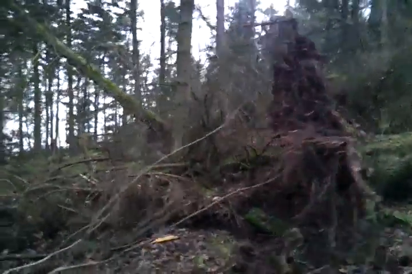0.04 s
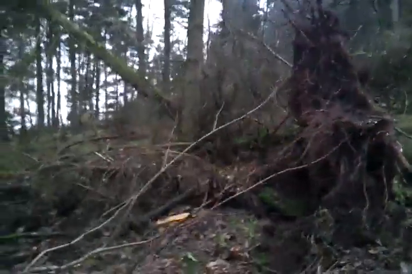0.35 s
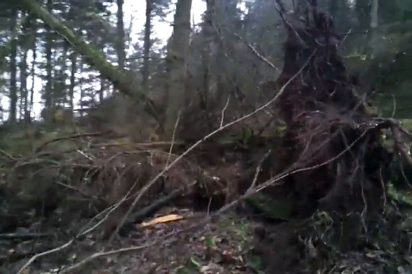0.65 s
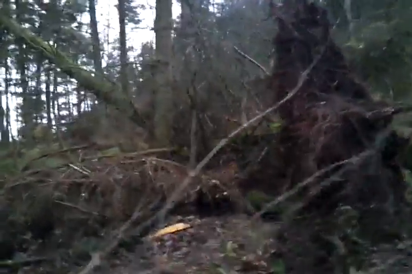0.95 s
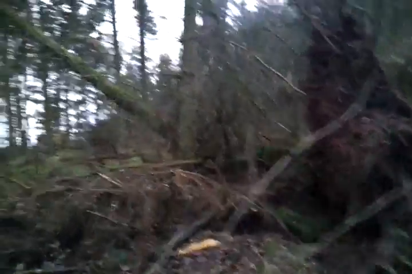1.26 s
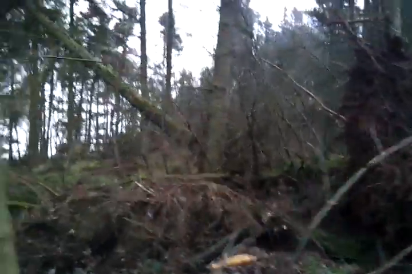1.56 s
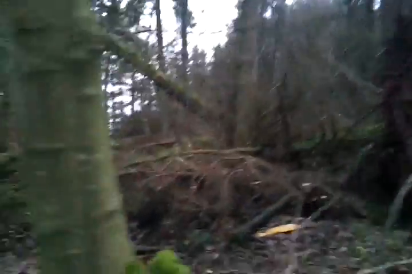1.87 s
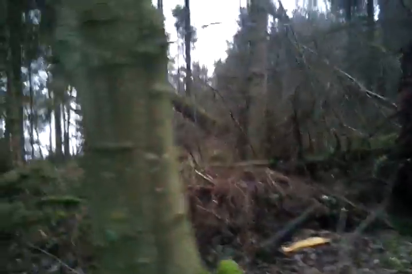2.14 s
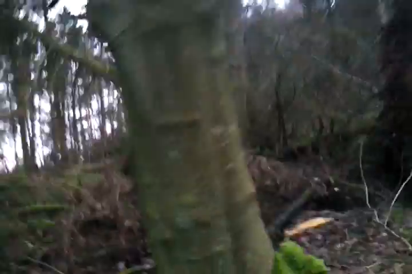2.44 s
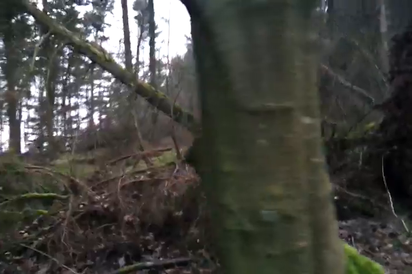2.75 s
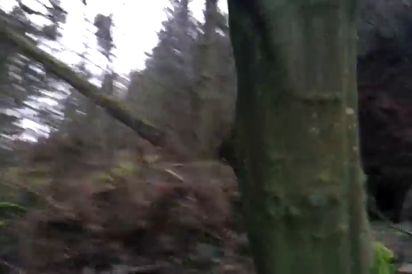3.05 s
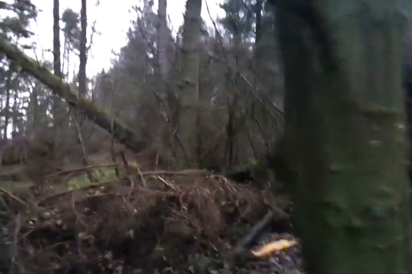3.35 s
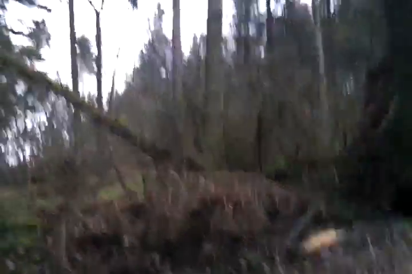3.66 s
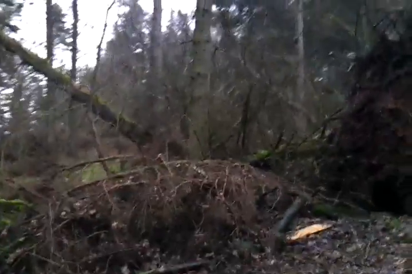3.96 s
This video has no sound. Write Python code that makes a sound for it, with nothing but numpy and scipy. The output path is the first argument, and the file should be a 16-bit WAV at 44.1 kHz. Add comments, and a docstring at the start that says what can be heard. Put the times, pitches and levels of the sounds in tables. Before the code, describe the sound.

Wind buffets the microphone and hisses through conifers while slow, soft steps crack small twigs.

```python
"""Wind hisses steadily through conifer crowns from the start, and gusts buffet the microphone:
the harder they blow, the louder and brighter the rumble. Someone walks slowly over the forest floor,
each step crushing needle litter. From 0.85 s on a dry twig snaps now and then; the strongest gusts
come just after 1 s, the sharpest snap at 1.7 s. The recorder is dull above 7 kHz throughout."""
import sys
import numpy as np
from scipy import signal
from scipy.fft import rfft, irfft
from scipy.io import wavfile

SR = 44100
rng = np.random.default_rng(int(sys.argv[2]) if len(sys.argv) > 2 else 0)


def inscribe(sig):
    """Save sig as 16-bit PCM at rate SR to the path in sys.argv[1].

    A 1-D sig is mono; a 2-D sig holds one channel per row.
    Samples are clipped to [-1, 1] before scaling.
    """
    pcm = np.round(np.clip(np.atleast_2d(sig).T, -1, 1) * 32767)
    wavfile.write(sys.argv[1], SR, pcm.astype(np.int16))


N = 176400


def undb(db):
    """Decibels to gain."""
    return 10 ** (np.asarray(db) / 20)


def unit(x):
    """Scale to rms 1."""
    return x / np.sqrt(np.mean(x ** 2))


def curve(rows):
    """Join (time_s, value) rows by straight lines."""
    return np.interp(np.arange(N) / SR, *np.array(rows).T)


def at_hz(rows, hz):
    """Read (freq_hz, value) rows on a log-frequency axis."""
    freq_hz, values = np.array(rows).T
    return np.interp(np.log(np.maximum(hz, 1)), np.log(freq_hz), values)


def colour(x, rows):
    """Filter by (freq_hz, gain_db) rows."""
    freq_hz = np.arange(N + 1) * SR / (2 * N)
    return irfft(rfft(x, 2 * N) * undb(at_hz(rows, freq_hz)))[:N]


def bands(x, count=20):
    """Yield (centre_hz, band) for overlapping half-octave bands from 20 Hz up."""
    spectrum = rfft(x)
    freq_hz = np.arange(N // 2 + 1) * SR / N
    half_octaves = 2 * np.log2(np.maximum(freq_hz, 20) / 20)
    for k in range(count):
        weight = np.maximum(1 - abs(half_octaves - k), 0)
        yield 20 * 2 ** (k / 2), irfft(spectrum * weight, N)


def wander(rate_hz):
    """Smooth random drift, rms 1, changing about rate_hz times a second."""
    freq_hz = np.arange(N // 2 + 1) * SR / N
    lowpass = np.exp(-(2 * freq_hz / rate_hz) ** 2 / 2)
    return unit(irfft(rfft(rng.standard_normal(N)) * lowpass, N))


def canopy():
    """Air through countless needles: a smooth hiss whose bands sway and flutter a little."""
    # hiss spectrum: freq_hz, density_db
    spectrum = [(100, -4), (300, -0.5), (500, 3), (800, -.5), (1300, 0), (2200, -2), (3500, -5.5),
                (5000, -7), (6600, -9), (9000, -9.5)]
    # hiss level: time_s, level_db
    levels = [(0, -33.5), (.6, -35.3), (1.4, -33.5), (2.1, -33.5), (2.7, -34), (3.3, -33.5), (4, -33)]
    sway_db, flutter_db = 1.25, .5
    hiss = unit(colour(rng.standard_normal(N), spectrum))
    swaying = sum(band * undb(sway_db * wander(rate_hz=5.6) + flutter_db * wander(rate_hz=39))
                  for _, band in bands(hiss))
    return undb(curve(levels)) * swaying


def fractures(rate_per_s=1500, spread_db=3):
    """Tiny fractures at random moments, a few much larger than the rest."""
    size = undb(spread_db * np.minimum(rng.exponential(size=N), 4))
    breaks = rng.random(N) < rate_per_s / SR
    return breaks * rng.choice([-1, 1], N) * size


def footsteps():
    """Needles and bark crackle as each step loads the litter, over a faint steady rustle."""
    # steps and scuffs: peak_s, half_length_s, level_db, bark_re_needles_db
    steps = [(.1, .1, -55, -7), (.75, 0.031, -36.5, -2), (.855, 0.025, -39, -17), (1.66, .09, -37, -8),
             (1.81, 0.017, -44, -14), (2.35, 0.079, -39.5, -2.5), (3.075, 0.093, -43, 1.5),
             (3.245, 0.026, -36, -14), (3.59, .04, -40.5, -7), (3.87, 0.027, -44.5, -1)]
    # crushed needles: freq_hz, density_db
    needle_spectrum = [(500, -9.5), (1500, -16.5), (3000, -7), (4300, -0.5), (5600, 4), (6800, 4),
                       (9000, -12)]
    # crushed bark and sticks: freq_hz, density_db
    bark_spectrum = [(300, -9), (900, -11), (2700, -2.5), (4000, -2), (7000, -11.5)]
    rustle_db = -45.5
    t = np.arange(N) / SR
    needle_gain, bark_gain = np.zeros(N), np.zeros(N)
    for peak_s, half_length_s, level_db, bark_re_needles_db in steps:
        load = undb(level_db) * np.exp(-((t - peak_s) / half_length_s) ** 2 / 2)
        needle_gain += load
        bark_gain += undb(bark_re_needles_db) * load
    needles = unit(colour(fractures(), needle_spectrum))
    bark = unit(colour(fractures(), bark_spectrum))
    return needles * np.hypot(needle_gain, undb(rustle_db)) + bark * bark_gain


def resonate(x, centre_hz, width_hz):
    """One resonance, gain 1 at its centre."""
    return signal.lfilter(*signal.iirpeak(centre_hz, centre_hz / width_hz, fs=SR), x)


def twigs():
    """Each snap: about 1 ms of tearing fibres rings the wood, with a faint tail of splinters."""
    # twig snaps: start_s, ring_peak_db, ring_hz, crack_re_ring_db, decay_s
    snaps = [(0.855, -19.5, 6300, -10, .001), (.8635, -15, 4960, -3.5, 0.0011),
             (1.0728, -16, 6400, 5, 0.00049), (1.1945, -16.5, 5900, -17, 0.00094),
             (1.615, -16.5, 6740, -1.5, 0.0015), (1.703, -7, 6800, -17, .0017),
             (1.722, -25, 6200, -12, 0.00104), (1.756, -10.5, 5400, -13, 0.0013),
             (2.3508, -15, 6000, -4, 0.00092), (3.114, -18, 5360, -3, 0.0015),
             (3.29, -19.5, 5850, -11, .001), (3.739, -16, 5960, -11, .0007),
             (3.8289, -16, 5960, -12, .0005), (3.833, -8.5, 4660, -19, .0004)]
    # wood resonances: freq_ratio, relative_width, gain_db
    modes = [(0.701, 0.21, -6), (1.03, 0.51, 4)]
    splinter_db, splinter_decay_s = -25, 0.013
    t = np.arange(SR // 20) / SR
    splinters = undb(splinter_db) * np.exp(-t / splinter_decay_s)
    out = np.zeros(N)
    for start_s, ring_peak_db, ring_hz, crack_re_ring_db, decay_s in snaps:
        tear = rng.choice([-1., 1.], len(t)) * (np.exp(-t / decay_s) + splinters)
        ring = sum(undb(gain_db) * resonate(tear, ring_hz * ratio, ring_hz * ratio * width)
                   for ratio, width, gain_db in modes)
        crack = resonate(tear, centre_hz=1250, width_hz=1300)
        snap = ring / abs(ring).max() + undb(crack_re_ring_db) * crack / abs(crack).max()
        start = int(start_s * SR)
        out[start:start + len(t)] += undb(ring_peak_db) * snap[:N - start]
    return out


def buffeting():
    """Turbulence on the microphone: gusts and slaps raise the small, fast, bursty eddies most."""
    # gusts at the microphone: time_s, strength_db
    gusts = [(0.0, -24.5), (0.07, -30), (0.11, -14), (0.13, -32), (0.17, -20.5), (0.22, -29), (0.34, -39),
             (0.4, -22), (0.42, -27), (0.5, -13.5), (0.68, -32.5), (0.71, -16.5), (0.86, -39.5),
             (0.99, -33.5), (1.04, -11), (1.18, -18.5), (1.19, -7), (1.29, -34), (1.32, -20.5),
             (1.55, -30.5), (1.67, -24), (1.7, -33), (1.82, -25), (1.84, -34), (1.98, -28), (2.0, -19),
             (2.07, -13.5), (2.09, -24), (2.16, -15), (2.36, -28), (2.38, -19), (2.53, -30), (2.56, -19.5),
             (2.66, -21.5), (2.67, -23), (2.73, -14.5), (2.78, -23), (2.82, -16.5), (2.96, -32.5),
             (2.99, -18), (3.06, -10.5), (3.1, -21), (3.25, -33.5), (3.31, -24), (3.35, -34.5), (3.38, -11),
             (3.43, -19.5), (3.49, -15), (3.52, -13.5), (3.55, -15), (3.62, -10.5), (3.69, -18.5),
             (3.71, -14.5), (3.78, -25.5), (3.89, -12.5), (4.0, -28.5)]
    # sudden slaps of air: start_s, extra_db
    slaps = [(0.103, 3.5), (.47, 3.5), (.485, 3.5), (1.02, 8.5), (1.046, 2.5), (1.112, 0), (1.148, 8.5),
             (2.064, 4.5), (2.139, 9), (2.224, 8.5), (2.644, 10), (2.704, 5), (3.376, 6.5), (3.391, 4),
             (3.516, 4), (3.707, 5.5)]
    # rumble in a moderate gust: freq_hz, density_db
    spectrum = [(15, -13), (30, -5.5), (60, -0.5), (115, 0.23), (200, -3.5), (280, -10), (400, -20),
                (550, -31), (1000, -45.5), (2000, -60)]
    # band growth with gust strength: freq_hz, db_per_gust_db
    growth = [(30, 0.39), (120, 0.74), (250, 0.99), (450, 1.69), (900, 1.68)]
    moderate_gust_db, rumble_db, slap_rise_s = -20, -20.5, 0.0036
    eddy_rate_hz, eddy_db, eddy_full_above_hz = 205, 3, 225
    t = np.arange(N) / SR
    gust_db = curve(gusts) - moderate_gust_db
    for start_s, extra_db in slaps:
        age = np.maximum(t - start_s, 0) / slap_rise_s
        gust_db += extra_db * age * np.exp(1 - age)
    eddies = wander(eddy_rate_hz)
    pressure = unit(colour(rng.standard_normal(N), spectrum))
    rumble = np.zeros(N)
    for centre_hz, band in bands(pressure, count=15):
        shake_db = eddy_db * min(centre_hz / eddy_full_above_hz, 1) * eddies
        rumble += band * undb(gust_db * at_hz(growth, centre_hz) + shake_db)
    return undb(rumble_db) * rumble


def scene():
    """All sources at one microphone."""
    return (buffeting() + canopy() + footsteps() + twigs())[None]


def record(dry):
    """The recorder rounds the strongest buffets and rolls off the treble."""
    # recorder treble response: freq_hz, gain_db
    treble = [(6700, 0.5), (7100, -3), (7500, -11), (7800, -18.5), (8050, -27), (8400, -21.5), (8800, -31)]
    ceiling, cutoff_hz = .8, 8800
    rounded = dry[0] / (1 + (dry[0] / ceiling) ** 4) ** .25
    lowpass = signal.ellip(8, .2, 80, cutoff_hz, fs=SR, output="sos")
    return signal.sosfilt(lowpass, colour(rounded, treble))[None]


dry = scene()
out = record(dry)
inscribe(out)
```